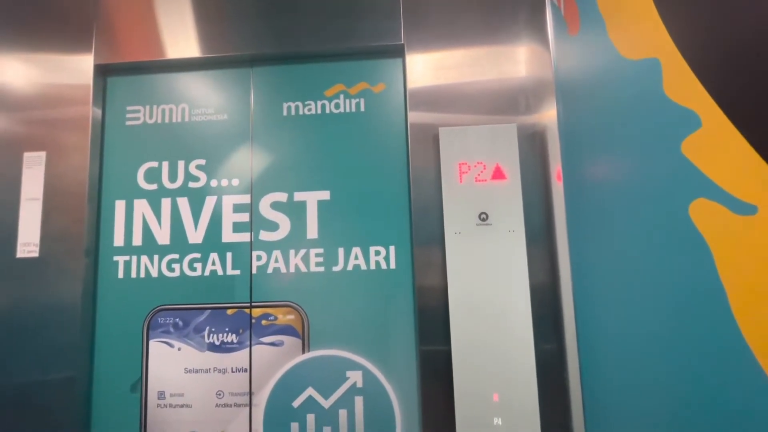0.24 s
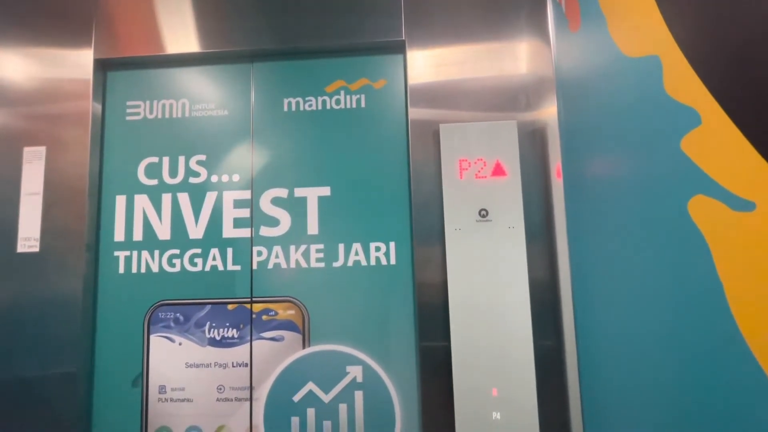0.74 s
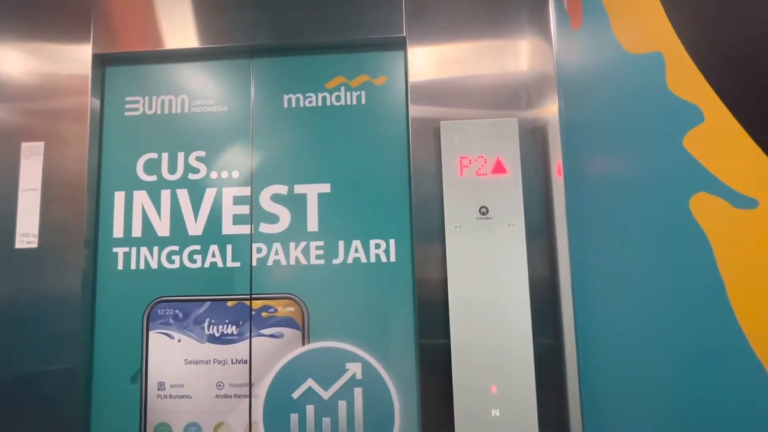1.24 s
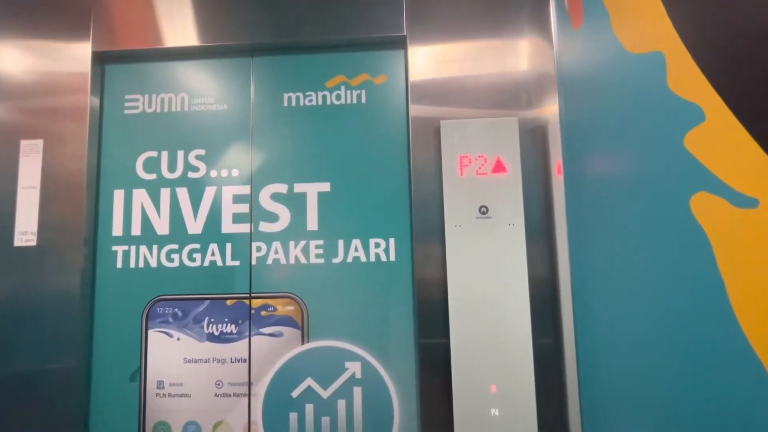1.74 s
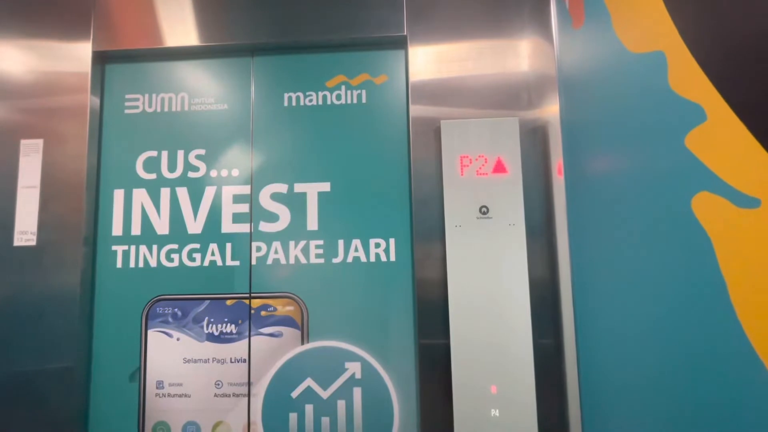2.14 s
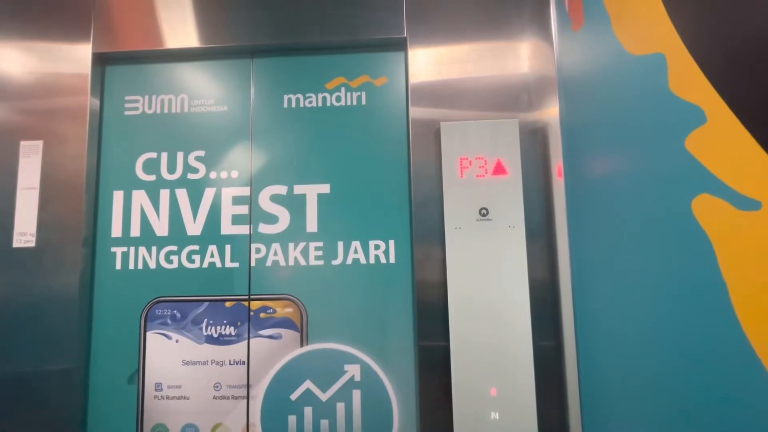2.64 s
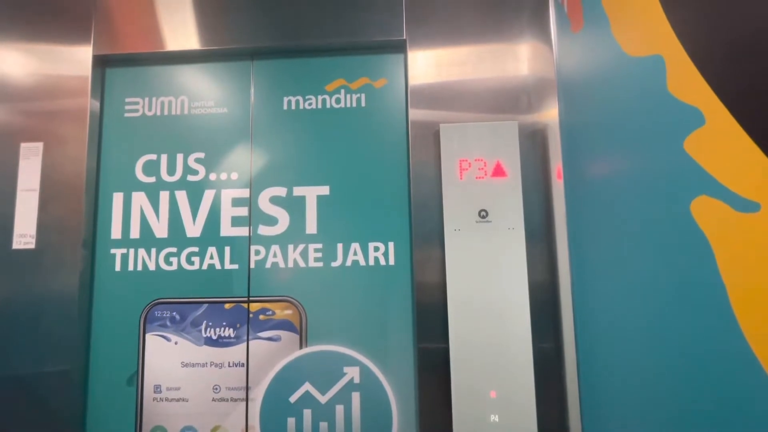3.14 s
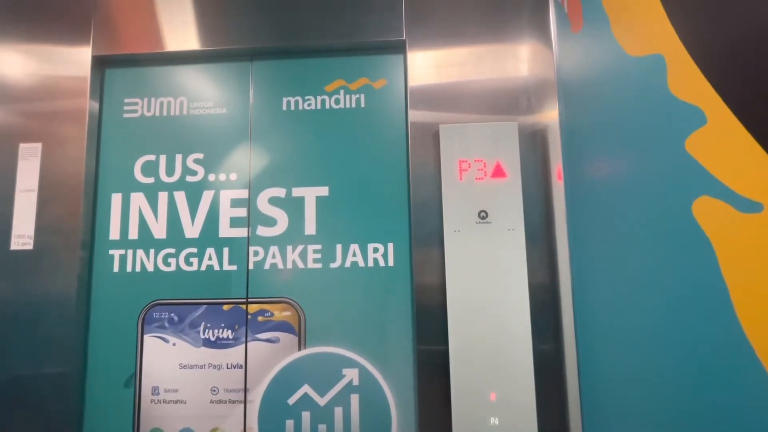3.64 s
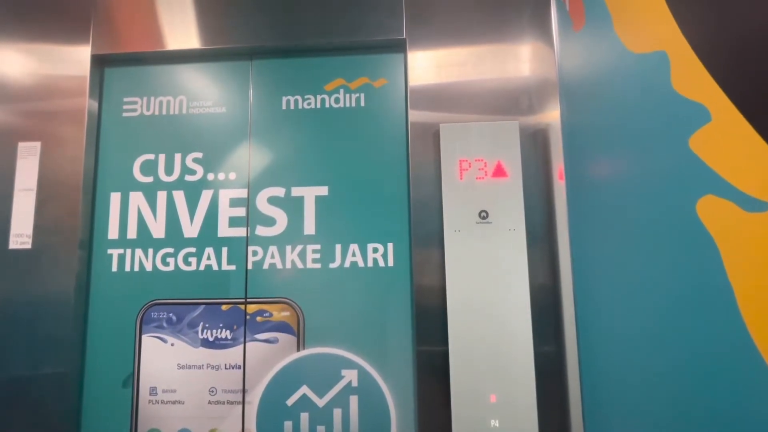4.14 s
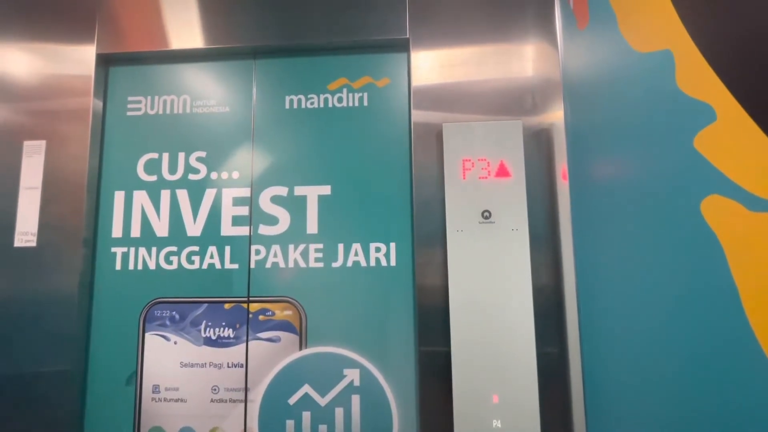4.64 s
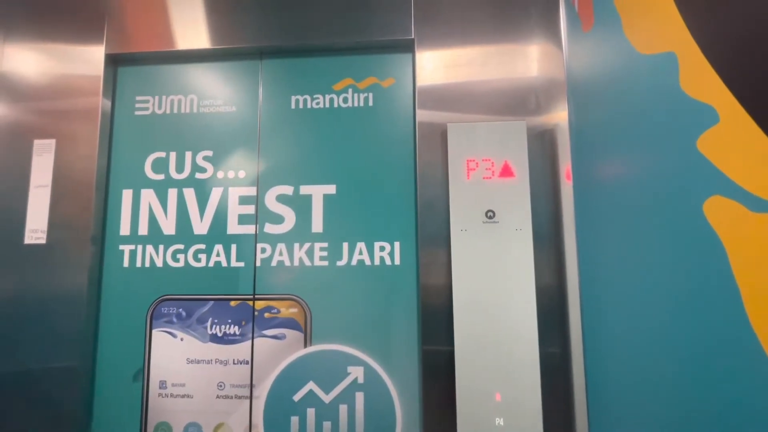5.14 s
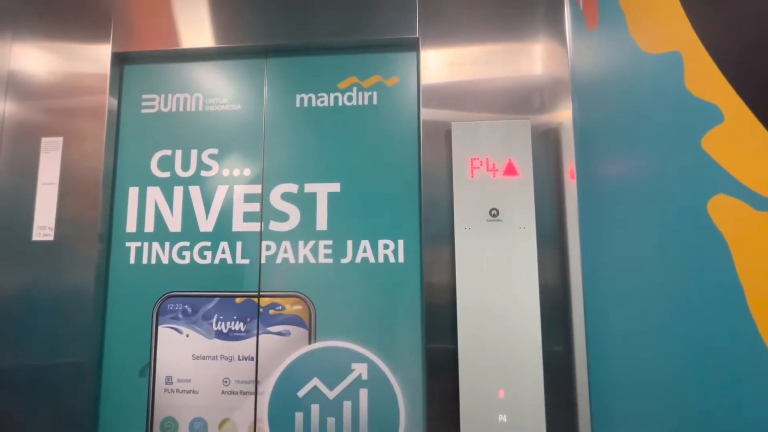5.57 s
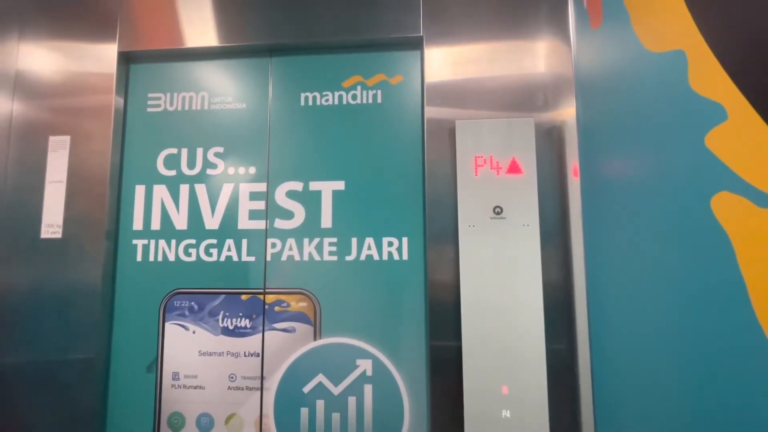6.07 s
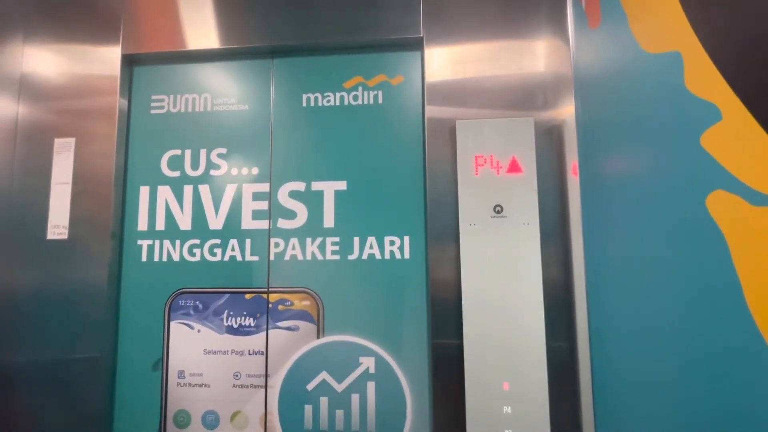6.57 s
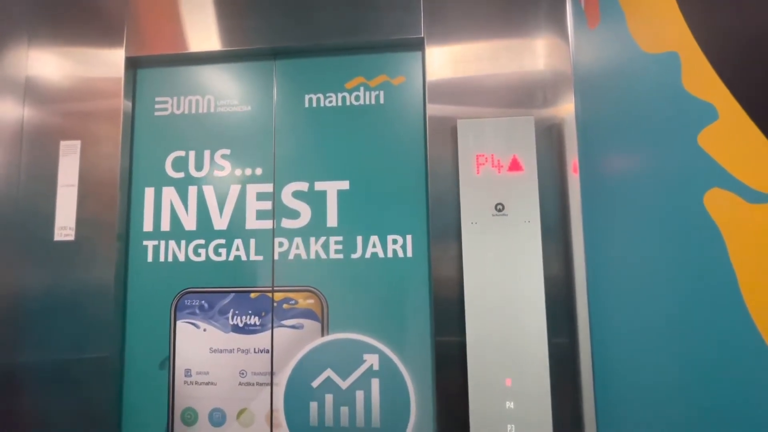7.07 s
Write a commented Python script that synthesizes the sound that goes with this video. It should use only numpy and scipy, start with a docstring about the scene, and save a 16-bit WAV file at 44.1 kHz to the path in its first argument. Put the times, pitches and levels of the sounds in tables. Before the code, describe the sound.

From 0 to 7.3 seconds, we are inside a small steel elevator cab going up, heard close in stereo. Broad fan air rushes constantly, boxy and metallic, mostly low and mid with muted treble. Rail rumble weakens around 1.7 seconds and grows fuller after 5. A steady hum near 100 hertz knocks about twenty times a second, swelling slightly around 6; a motor hum near 174 peaks at 2.5. A thin whine near 875 hertz sags slightly until 1.5, recovers, and keeps swelling and fading irregularly. A tone near 1415 throbs and rasps at the fan's rate, in uneven waves. Panels drone near 227 hertz, and cab air booms near 140, with a brief surge around 2.9. Very soft hissy brushes come at 0.9 and 6.8 seconds. The ride continues without arriving.

```python
"""Inside a steel elevator cab on its way up.
Ceiling-fan air is broadband noise shaped by the cab's modes, with rail rumble below it.
Mains and motor hum are steady lines; the panels drone and the enclosed air booms as unsteady low tones.
A high drive whine swells and fades, and a higher fan tone throbs and rasps once a turn.
Two soft brushes are short enveloped bursts of band noise."""
import sys
import numpy as np
from scipy import signal
from scipy.fft import rfft, irfft
from scipy.io import wavfile

SR = 44100
rng = np.random.default_rng(int(sys.argv[2]) if len(sys.argv) > 2 else 0)


def to_wav(s):
    """Save 16-bit WAV."""
    ch = np.atleast_2d(s).T  # columns
    pcm = np.round(np.clip(ch, -1, 1) * 32767)  # PCM
    wavfile.write(sys.argv[1], SR, pcm.astype(np.int16))


N = 322192
TIME = np.arange(N) / SR  # s
BINS_HZ = np.fft.rfftfreq(N, 1 / SR)


def gain_of(db):
    """Level law: decibels to amplitude ratio."""
    return 10 ** (np.asarray(db) / 20)


def evened(x):
    """Normalization: scales a signal or spectrum to rms 1."""
    return x / np.sqrt(np.mean(abs(x) ** 2) + 1e-20)


def read(points):
    """Spectral interpolation: a table over log frequency, at every bin."""
    hz, value = np.transpose(points)
    return np.interp(np.log(BINS_HZ + 1), np.log(hz + 1), value)


def follow(rows):
    """Linear interpolation in time: the columns of a curve, at every sample."""
    s, *columns = np.transpose(rows)
    return [np.interp(TIME, s, column) for column in columns]


def white():
    """White noise: a complex Gaussian spectrum of equal mean power in every bin."""
    return rng.standard_normal(len(BINS_HZ)) + 1j * rng.standard_normal(len(BINS_HZ))


def drift(rate_hz):
    """Low-passed Gaussian noise: a random wander of rms 1, mostly slower than rate_hz."""
    lowpass = np.exp(-(BINS_HZ / rate_hz) ** 2 / 2)
    return evened(irfft(white() * lowpass, N))


def flutter(rate_hz):
    """Complex narrowband noise: a random wander in both size and phase."""
    return evened(drift(rate_hz) + 1j * drift(rate_hz))


def spin(hz):
    """Phase integration: a phasor that follows a pitch; its real part has rms 1."""
    turns = np.cumsum(hz * np.ones(N)) / SR
    return np.sqrt(2) * np.exp(2j * np.pi * (turns + rng.random()))


def ports(pan_db):
    """Level difference at constant power: left and right gains of mean power 1."""
    pair = gain_of(np.array([pan_db, -pan_db]).reshape(2, -1) / 2)
    return pair / np.sqrt(np.mean(pair ** 2, 0))


def place(tone, pan_db, lead):
    """Standing wave: the tone differs in size and phase at two points; left leads by lead radians."""
    return ports(pan_db) * np.array([tone * np.exp(1j * lead), tone]).real


def cab_ripple(decay_s, depth):
    """Room response: reflections between the steel walls comb the spectrum into many narrow peaks."""
    echoes = rng.standard_normal(N) * np.exp(-TIME / decay_s)
    response = abs(evened(rfft(echoes)))
    dense = BINS_HZ ** 2 / (BINS_HZ ** 2 + 600 ** 2)  # modes crowd together only above the bass
    return evened((response + 0.14) ** (depth * dense))


# spectral envelope of the rush, relative: f/Hz, density/dB per Hz
AIR_SPECTRUM = [(15, -85.5), (24.0, -66), (55.0, -59), (95.0, -65), (150.0, -59.5), (167, -61),
                (290.0, -70.5), (400.0, -67), (700.0, -69.5), (930.0, -61.5), (1120.0, -69), (1780.0, -67),
                (2080, -73.5), (2400, -74.5), (2850.0, -76), (3250, -79), (3650, -80.5), (4300, -84),
                (4950, -84), (5350, -86.5), (5900, -86), (6500, -87), (7700.0, -92.5), (9600.0, -88.5)]
AIR_DB = -29  # rms level before the slow gains
# cab resonances excited by the rush: f/Hz, width/Hz, lift/dB, left-right/dB
CAB_MODES = [(39.5, 3, 9.5, 1), (56, 3, 10, -4), (79.7, 5.8, 9.5, -4.5), (145, 14, 3.5, -7.5),
             (193.3, 16, 6.5, -6), (255.3, 17.4, 13.5, -11.5), (315.8, 10, 10, -4.5), (334.2, 7, 11, 3.5),
             (369, 26, 10.5, -2), (392, 14, 9.5, 0), (429.5, 18.6, 10.5, -0.5), (508, 14, 8, 10),
             (536.6, 6, 13, -8), (580, 69, 3, 3.5), (615, 6.5, 11.5, 12), (641, 3.5, 10.5, -10.5),
             (666, 6, 11, -0.5), (661, 193, 5, 2), (814, 28, 6, -2.5), (978, 8.8, 5.5, 9),
             (1080, 130, 0.5, -14.5), (1178, 40, 6.5, 2), (1285, 42, 5.5, 7), (1430, 92, 5, 4),
             (1500, 65, 5, 13), (1634, 40, 4.5, 1), (1796, 29, 6, 0.5), (1850, 41, 4, 3.5),
             (2226, 120, 2, -6), (2940, 250, 0, -2.5), (6200, 300, 0.5, 3), (7130, 300, 2, 1.5)]
# balance of the rush between the ports: f/Hz, left-right/dB
AIR_BALANCE = [(50, -7.5), (130, -8.5), (190, 0), (300, 2.5), (450, -8.5), (700, 6), (1300, 2.5),
               (2000, 1.5), (4000, 0), (7000, 4.5), (9000, -1)]
# correlation of the ports, limited to +-1 when used: f/Hz, likeness (negative = opposed)
PORT_LIKENESS = [(150, 1), (240, 0.63), (340, 0.13), (500, 0.1), (850, 0.084), (1400, 0.079), (2100, -0.33),
                 (2600, 0.21), (3400, -0.27), (4300, 0.28), (5300, -0.22), (6400, 0.39), (8200, 0.39),
                 (9700, -1.04)]
# brightness of the airflow: t/s, treble gain/dB
TREBLE_CURVE = [(0, -0.5), (2, -0.45), (3.8, -0.4), (5.5, 0.5), (6.8, 0.9), (7.31, 0)]
# rumble of the car on its rails: t/s, gain/dB
RUMBLE_CURVE = [(0, 0), (.25, 1), (.7, -2), (1.7, -8), (2.7, -3.5), (3.4, -6), (4.2, -6), (4.9, 0),
                (5.7, 2), (6.6, 2), (7.31, 0)]


def rush():
    """Modal excitation: fan air and rail rumble ring the cab, alike in the bass, more diffuse above."""
    same = np.clip(read(PORT_LIKENESS), -1, 1)
    left = white()
    right = same * left + np.sqrt(1 - same ** 2) * white()
    power = ports(read(AIR_BALANCE)) ** 2
    for hz, width_hz, lift_db, pan_db in CAB_MODES:
        bell = 1 / (1 + ((BINS_HZ - hz) / width_hz) ** 2 * 2) ** 2
        power = power + abs(gain_of(lift_db) ** 2 - 1) * bell * ports(pan_db) ** 2
    ripple = np.array([cab_ripple(decay_s=0.077, depth=0.78) for side in range(2)])
    colour = np.sqrt(power) * ripple * gain_of(read(AIR_SPECTRUM))
    noise = evened(irfft(np.array([left, right]) * colour, N))

    # three bands that sum to the noise, split near 66 and 2300 Hz
    rumble = irfft(rfft(noise) / (1 + (BINS_HZ / 66) ** 6), N)
    hiss = noise - irfft(rfft(noise) / (1 + (BINS_HZ / 2300) ** 6), N)
    body = noise - rumble - hiss
    treble_db, = follow(TREBLE_CURVE)
    rumble_db, = follow(RUMBLE_CURVE)
    unsteadiness = gain_of(0.49 * drift(rate_hz=13.0))  # 0.49 dB rms
    air = (body + hiss * gain_of(treble_db)) * unsteadiness
    return gain_of(AIR_DB) * (air + rumble * gain_of(rumble_db))


# speed of the fan: t/s, rotation rate/Hz
FAN_SPEED = [(0, 20.45), (.9, 20.45), (1.6, 21.15), (2.3, 20.42), (4.7, 20.48), (5.6, 20.75), (6.4, 20.36),
             (7.31, 20.36)]


def fan_turn(peak_s=3.382):
    """Rotation: integrated fan speed with random jitter, in radians; at zero the fan tone is loudest."""
    turns_hz, = follow(FAN_SPEED)
    turns = np.cumsum(turns_hz) / SR
    jitter = 0.32 * drift(rate_hz=4.0)
    return 2 * np.pi * (turns - np.interp(peak_s, TIME, turns)) + jitter


# mains hum, then sidebands one and two fan turns higher, before the swell:
# left level/dB, right level/dB, unsteadiness/share
MAINS_LINES = [(-36, -31, 0.057), (-46.5, -38, 0.46), (-54.5, -46.5, 0.69)]
# octave of the mains hum, before the swell: left level/dB, right level/dB, unsteadiness/share
MAINS_OCTAVE = (-57.5, -46.5, .55)
# slow rise of the mains hum, with a fall at the end: t/s, gain/dB
HUM_SWELL = [(0, -1), (3.5, -1), (5, -0.3), (6.1, 1), (7.31, -2)]
# motor hum, strongest at 2.5 s: t/s, level/dB
MOTOR_LEVEL = [(0, -60), (1.2, -46), (2.5, -42.5), (4.1, -45), (4.6, -53), (7.31, -56)]
MAINS_HZ, MOTOR_HZ = 99.9, 173.5


def hum(turn, knock_lead=2.28):
    """Beating of sidebands: mains hum knocks once a fan turn; its octave and a motor tone join it, each in
    phase at both ports."""
    mains = spin(MAINS_HZ)
    lines = []
    for order, row in enumerate(MAINS_LINES):
        sideband = mains * np.exp(1j * order * (turn + knock_lead))
        lines.append((sideband, *row))
    lines.append((spin(2 * MAINS_HZ), *MAINS_OCTAVE))
    out = np.zeros((2, N))
    for tone, left_db, right_db, unsteady in lines:
        unsteady_tone = tone * evened(1 + unsteady * flutter(rate_hz=1.8))
        out += gain_of([[left_db], [right_db]]) * unsteady_tone.real
    swell_db, = follow(HUM_SWELL)
    motor_db, = follow(MOTOR_LEVEL)
    motor_tone = spin(MOTOR_HZ + 0.4 * drift(rate_hz=1.7)).real
    motor = ports(pan_db=-15.5) * gain_of(motor_db) * motor_tone
    return out * gain_of(swell_db) + motor


# swelling and fading of the drive whine: t/s, level/dB
WHINE_LEVEL = [(0, -32.5), (.12, -29.5), (.36, -31.5), (.5, -31), (.6, -48), (.7, -42.5), (.87, -40),
               (.95, -35.5), (1.05, -44), (1.2, -49), (1.33, -31), (1.48, -32), (1.64, -34), (1.77, -49),
               (1.82, -33.5), (1.93, -29), (2.08, -38.5), (2.18, -35.5), (2.25, -32.5), (2.43, -30.5),
               (2.58, -34), (2.67, -59), (2.76, -34), (2.85, -47), (2.92, -31), (3.03, -36.5), (3.2, -31.5),
               (3.36, -30), (3.46, -30.3), (3.58, -33), (3.7, -40.5), (3.77, -35), (4.02, -40.5),
               (4.12, -31.5), (4.22, -39), (4.3, -31), (4.47, -32.5), (4.56, -34), (4.78, -30.5),
               (5.0, -34), (5.1, -39.5), (5.23, -31.5), (5.35, -38.5), (5.5, -34.5), (5.61, -44.5),
               (5.85, -33), (5.97, -37), (6.2, -42.5), (6.33, -32), (6.52, -44), (6.77, -32), (7.04, -44.5),
               (7.09, -36), (7.18, -45), (7.31, -34.5)]
# whine pitch following the motor, with a sag and recovery early on: t/s, f/Hz
WHINE_PITCH = [(0, 879.2), (0.96, 872.7), (1.45, 867.5), (1.9, 874.7), (2.9, 874.5), (3.36, 877.7),
               (3.8, 873.8), (7.31, 873.8)]
# balance of the whine: t/s, left-right/dB
WHINE_BALANCE = [(0, 13), (.5, 2), (1.5, 1.5), (2.3, 2), (3.4, 3.5), (4.4, 5), (5.3, 9), (6, 4), (7.31, 1)]
WANDER_HZ, WANDER_RATE_HZ = 0.41, 1.88  # rms pitch wander and its rate
WHINE_ROUGHNESS = 0.06  # share of the tone


def whine(pulsing=0.079):
    """Amplitude modulation: the drive's nearly pure tone swells, pulsing faintly at twice the fan's rate."""
    db, = follow(WHINE_LEVEL)
    hz, = follow(WHINE_PITCH)
    pan_db, = follow(WHINE_BALANCE)
    turns_hz, = follow(FAN_SPEED)
    tone = spin(hz + WANDER_HZ * drift(rate_hz=WANDER_RATE_HZ))
    tone = tone * evened(1 + WHINE_ROUGHNESS * flutter(rate_hz=13.0))
    pulses = 1 + pulsing * spin(2 * turns_hz).real
    return place(gain_of(db) * tone * pulses, pan_db, lead=0.77)


# swelling of the fan tone, before the trim: t/s, level/dB
THROB_LEVEL = [(0, -52), (.45, -46), (.65, -36), (1.08, -39.5), (1.3, -33), (1.58, -39.5), (1.7, -35),
               (2.08, -46.5), (2.5, -34), (2.77, -43.5), (3.27, -32.5), (3.5, -32.5), (3.7, -40),
               (3.83, -47.5), (4.1, -34), (4.27, -34), (4.45, -43), (4.75, -36.5), (5.07, -34.5),
               (5.35, -41), (5.55, -37.5), (5.78, -34), (5.93, -46), (6.06, -31.5), (6.3, -33.5),
               (6.52, -43), (6.85, -33.5), (7.1, -38), (7.31, -45)]
# resonances rubbed once a turn: f/Hz, width/Hz, level against the fan tone/dB, lead/rad
RUB_MODES = [(1428, 28, -11, 0), (1460, 8, -11, 0), (1288, 45, -9.5, 1.2), (1590, 45, -14, 2),
             (1000, 30, -12, .3)]
THROB_HZ, THROB_SWING_HZ = 1415, 11  # mean pitch, and swing either way within a turn
THROB_DEPTH_DB = 6  # rise and fall either way within a turn


def throb(turn, trim_db=-1.5, unsteady=0.14, rise_lead=0.45):
    """Periodic friction: each turn's rub swells and lifts the fan tone and stirs a rasp of resonances."""
    db, = follow(THROB_LEVEL)
    hz = THROB_HZ + THROB_SWING_HZ * np.sin(turn + rise_lead) + 3 * drift(rate_hz=4.08)
    pulses = gain_of(THROB_DEPTH_DB * np.cos(turn)) * (1 + unsteady * flutter(rate_hz=11))
    out = place(spin(hz) * evened(pulses), pan_db=3.0, lead=1.66)
    for mode_hz, width_hz, mode_db, lead in RUB_MODES:
        bell = np.exp(-((BINS_HZ - mode_hz) / width_hz) ** 2 / 2)
        band = irfft(np.array([white(), white()]) * bell, N)
        rasp = band * gain_of(THROB_DEPTH_DB * np.cos(turn + lead))
        out = out + ports(pan_db=2.0) * gain_of(mode_db) * evened(rasp)
    return gain_of(db + trim_db) * out


# drone of the cab panels, before the trim: t/s, level/dB
DRONE_LEVEL = [(0, -51), (.23, -37.5), (.35, -51.5), (.63, -36), (.74, -41), (1.02, -36), (1.13, -43),
               (1.25, -42.5), (1.7, -46.5), (2.2, -45.5), (2.37, -34), (2.53, -46.5), (3.14, -40),
               (3.25, -31.5), (3.38, -32.5), (3.58, -42.5), (3.68, -34.5), (3.8, -36), (4.03, -34.5),
               (4.2, -39.5), (4.5, -39), (4.75, -44.5), (4.97, -34), (5.13, -40), (5.2, -31.5), (5.38, -40),
               (5.58, -36.5), (5.7, -40.5), (5.82, -38.5), (6.12, -36.5), (6.23, -44), (6.78, -39),
               (7.31, -45.5)]
DRONE_HZ = 227.4


def drone(trim_db=-0.7, unsteady=0.16):
    """Panel vibration: the cab panels shudder more and less around one low pitch."""
    db, = follow(DRONE_LEVEL)
    tone = spin(DRONE_HZ + 1.27 * drift(rate_hz=3.1))
    tone = tone * evened(1 + unsteady * flutter(rate_hz=13))
    return ports(pan_db=-5.5) * gain_of(db + trim_db) * tone.real


# boom of the air in the cab, before the trim: t/s, level/dB
BOOM_LEVEL = [(0.0, -46), (0.28, -32.5), (0.34, -47), (1.2, -37.5), (1.3, -49), (1.53, -40), (1.77, -50),
              (1.83, -34), (2.38, -40), (2.79, -53), (2.93, -28.5), (2.97, -40.5), (5.27, -42.5),
              (6.08, -40), (6.17, -46), (6.33, -38), (6.37, -57), (6.47, -39), (6.92, -42), (7.06, -32),
              (7.1, -39), (7.31, -46)]
BOOM_HZ = 140


def boom(trim_db=-1.0, wander_hz=3, unsteady=0.21):
    """Cavity resonance: the air in the cab booms in uneven swells, its pitch wandering."""
    db, = follow(BOOM_LEVEL)
    tone = spin(BOOM_HZ + wander_hz * drift(rate_hz=4))
    tone = tone * evened(1 + unsteady * flutter(rate_hz=8.2))
    return ports(pan_db=-6.5) * gain_of(db + trim_db) * tone.real


# soft brushes: t/s, level at the crest/dB, centre f/Hz, width/octaves, decay/s
BRUSHES = [(.86, -50.5, 7300, 0.6, .042), (6.81, -48.5, 4500, 0.45, 0.07)]


def brushes():
    """Transient band noise: brief, soft puffs of hiss that rise quickly and decay exponentially."""
    out = np.zeros((2, N))
    for s, db, hz, octaves, decay_s in BRUSHES:
        colour = np.exp(-(np.log2((BINS_HZ + 1) / hz) / octaves) ** 2 / 2)
        hiss = evened(irfft(np.array([white(), white()]) * colour, N))
        age = np.maximum(TIME - s, 0) / decay_s
        envelope = np.sqrt(2 * age) * np.exp(1 / 2 - age)  # crest of 1 at half a decay time
        out += gain_of(db) * hiss * envelope
    return out


def scene():
    """Superposition: everything heard in the cab adds linearly."""
    air, turn = rush(), fan_turn()
    return air + hum(turn) + whine() + throb(turn) + drone() + boom() + brushes()


EDGE_HZ = 9750  # upper edge of the band


def record(dry):
    """Band limitation: a linear-phase low-pass removes the highest treble."""
    lowpass = signal.firwin(511, EDGE_HZ, window=("kaiser", 9), fs=SR)
    return signal.oaconvolve(dry, lowpass[None], "same")


dry = scene()
out = record(dry)
to_wav(out)
```